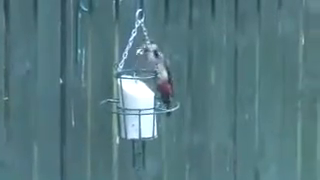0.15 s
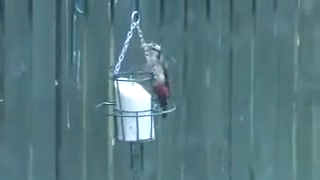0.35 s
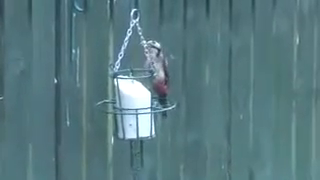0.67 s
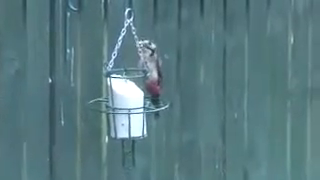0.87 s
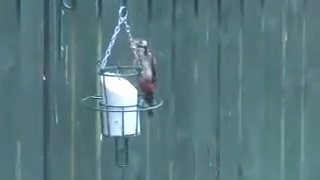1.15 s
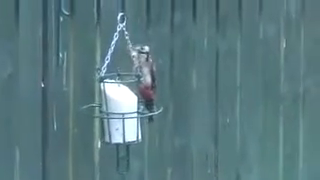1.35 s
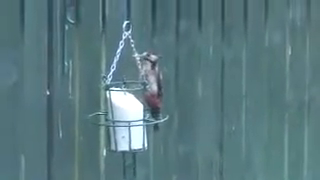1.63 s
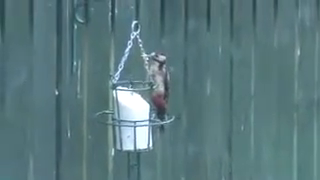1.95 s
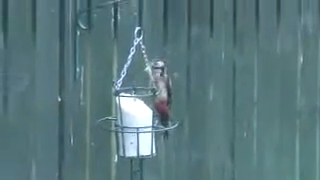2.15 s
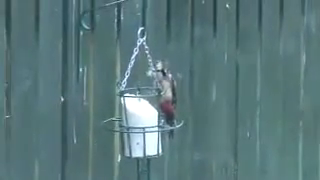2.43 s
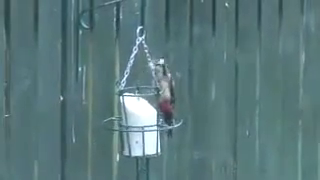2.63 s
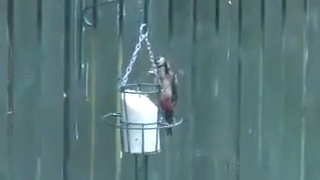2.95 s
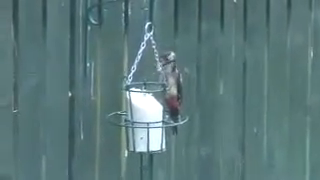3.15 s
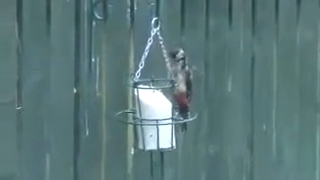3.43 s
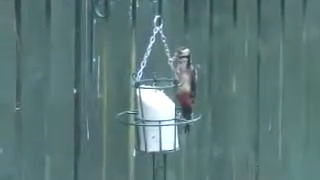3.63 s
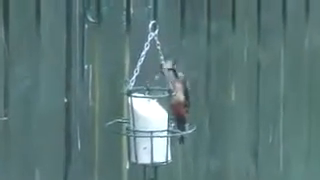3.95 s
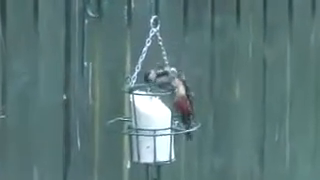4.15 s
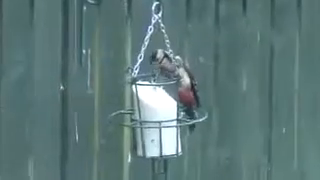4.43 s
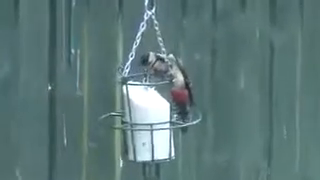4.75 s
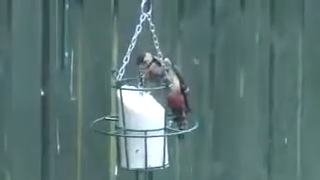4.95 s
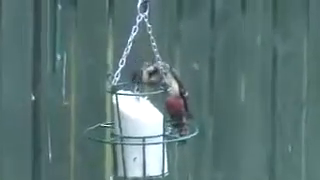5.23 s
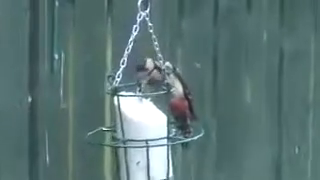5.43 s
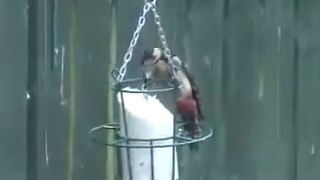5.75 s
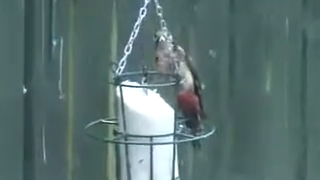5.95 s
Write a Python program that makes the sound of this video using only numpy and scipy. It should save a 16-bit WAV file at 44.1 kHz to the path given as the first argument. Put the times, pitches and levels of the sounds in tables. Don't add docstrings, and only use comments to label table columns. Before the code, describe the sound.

Sharp, hollow pecks and tiny wire clicks come in uneven bursts, with brief claw scrapes, above a constant electrical hum, thin whine and hiss.

```python
import sys
import numpy as np
from scipy import signal
from scipy.fft import rfft, irfft
from scipy.io import wavfile
from scipy.ndimage import map_coordinates

SR = 44100
rng = np.random.default_rng(int(sys.argv[2]) if len(sys.argv) > 2 else 0)


def amplitude_ratio(level_db):
    exponent = np.asarray(level_db, float) / 20
    return 10 ** exponent


def wav_record(signal):
    frames = np.transpose(np.atleast_2d(signal))
    bounded = np.clip(frames, -1, 1)
    quanta = np.round(bounded * 32767).astype(np.int16)
    wavfile.write(sys.argv[1], SR, quanta)


N = 268128
TOP_HZ = 15900


def along(points, hz):
    f, v = np.transpose(points)
    return np.interp(np.log(hz + 1), np.log(f + 1), v)


def unit(x):
    return x / np.sqrt(np.mean(x ** 2) + 1e-20)


def wobble(rate):
    points = rng.standard_normal(int(N * rate / SR) + 4)
    return map_coordinates(points, [np.arange(N) * rate / SR])


def empty_track():
    return np.zeros((2, N + SR))


def add(track, s, sound):
    place = track[:, max(round(s * SR), 0):]
    place[:, :sound.shape[1]] += sound


# pitch in Hz, time to fade by 60 dB in seconds.
ROOM = [(60, 0.74), (500, 0.53), (2000, 0.33), (5000, 0.37), (14000, 0.14)]
# pitch in Hz, shared part of the tail [0 to 1].
SHARED = [(200, 0.93), (700, 0.74), (3000, 0.27), (12000, 0.75)]
# delay in seconds, left level in dB, right level in dB.
WALLS = [(.0028, 3, -5), (.0052, 8, 2), (.0078, 4, -1), (.012, -5, -1), (.0165, -8, -4), (.022, -8, -4)]


def in_room(x, wet_db, left_db, right_db):
    size = SR // 3
    hz, t, z = signal.stft(rng.standard_normal((3, size)), SR, nperseg=256)
    shared = np.clip(along(SHARED, hz), 0, 1)[:, None]
    z = np.sqrt(shared) * z[2] + np.sqrt(1 - shared) * z[:2]
    fade = amplitude_ratio(-60 * t / along(ROOM, hz)[:, None])
    tail = signal.istft(z * fade, SR, nperseg=256)[1][:, :size]
    tail = tail * (1 - np.exp(-np.arange(size) / SR / .004))
    tail = tail / np.linalg.norm(tail[0]) * amplitude_ratio([[wet_db + .2], [wet_db - .2]])
    tail[:, 0] += amplitude_ratio([left_db, right_db])
    for delay, left, right in WALLS:
        arrival = delay * SR * rng.uniform(.9, 1.1) + rng.uniform(0, 3.5, size=2)
        tail[[0, 1], np.round(arrival).astype(int)] += amplitude_ratio([left, right])
    return signal.fftconvolve(x[None], tail, axes=1)


def burst(hz, cycles):
    turns = np.arange(SR // 30) / SR * hz
    age = turns * 1.5 / max(cycles, .6)
    return np.sin(2 * np.pi * turns) * (age * np.exp(1 - age)) ** 3


def thud(db, hz, cycles):
    return amplitude_ratio(db - 14.0) * (burst(hz, cycles) - burst(0.53 * hz, 0.89))


def blend(parts):
    z = rfft(parts)
    size = np.sqrt(np.sum(abs(z) ** 2, 0))
    return irfft(size * np.exp(1j * np.angle(z.sum(0))), parts.shape[1])


# time in seconds, hum level in dB.
HUM_DRIFT = [(0.0, -44), (0.74, -43), (1.83, -44), (2.44, -45.5), (2.83, -45.5), (3.28, -44.5),
             (3.79, -43.5), (4.91, -43.5), (5.84, -46), (6.08, -44.5)]


def hum_drift():
    s, hum_db = np.transpose(HUM_DRIFT)
    return np.interp(np.arange(N) / SR, s, hum_db), hum_db.mean()


def mains_hum():
    t = np.arange(N) / SR
    level = amplitude_ratio(hum_drift()[0] + 0.27 * wobble(25))
    return np.sqrt(2) * level * np.sin(2 * np.pi * 120.0 * t + 0.055 * wobble(3.6))


# pitch in Hz, rms level in dB.
MOTOR = [(1319, -69.5), (1561, -70.5), (2099, -70.5), (2697, -66.5), (5701, -71)]
# multiple of its base pitch, rms level in dB.
CIRCUIT = [(1, -70.5), (3, -71.5), (4, -71), (5, -71)]
# pitch in Hz, rms level in dB.
BRUSHES = [(2000, -76), (3000, -76.5), (6000, -75), (8000, -88), (13000, -98), (15500, -114)]


def camera_whine():
    t = np.arange(N) / SR
    drift = wobble(25)
    circuit_hz, brush_hz = 2885.0, 300.0
    tones = list(MOTOR) + [(k * circuit_hz, db) for k, db in CIRCUIT]
    out = sum(amplitude_ratio(db + 2.0) * np.sin(2 * np.pi * hz * t + 0.097 * drift) for hz, db in tones)
    for hz in np.arange(brush_hz * 7, TOP_HZ, brush_hz):
        level = amplitude_ratio(along(BRUSHES, hz) + rng.normal(1.6, 0.8))
        out += level * np.sin(2 * np.pi * (hz * t + rng.uniform()) + drift)
    return out


# pitch in Hz, level in dB per Hz.
HISS = [(15, -64), (30, -13), (53, -26), (84, -22), (150, -28), (200, -29), (335, -30), (550, -24),
        (900, -30.5), (1300, -29.5), (2500, -36), (5800, -38.5), (7200, -41), (12000, -43), (16000, -48.5)]
# pitch in Hz, likeness [0 to 1].
ALIKE = [(30, 0.39), (70, 0.09), (250, 0.32), (1000, 0.3), (7000, 0.14), (11000, 0.6), (15000, 0.86)]


def microphone_hiss():
    hz, _, z = signal.stft(rng.standard_normal((2, N + 8192)), SR, nperseg=4096)
    turn = np.arccos(np.clip(along(ALIKE, hz), 0, 1)) / 2
    z = z * (amplitude_ratio(along(HISS, hz)) * [np.cos(turn), np.sin(turn)])[..., None]
    mid, side = signal.istft(z, SR, nperseg=4096)[1][:, 4096:N + 4096]
    hiss = np.array([mid + side, mid - side]) / np.std(mid) * amplitude_ratio([[.4], [-.4]])
    hum_db, mean_db = hum_drift()
    follow_db = 0.2 * (hum_db - mean_db)
    patchy_db = .4 * wobble(1.89) + .6 * wobble(13)
    return hiss * amplitude_ratio(-52.5 + 1.0 + follow_db + patchy_db)


SPOTS = {"face": (2000, 2420, 1226, 3.2), "edge": (1795, 2380, 1350, 2.67), "side": (2100, 2890, 1097, 2.8),
         "top": (1980, 3360, 1010, 3.47), "rim": (1790, 3490, 1060, 4.06), "crust": (2230, 2630, 1150, 2.5),
         "base": (1620, 2760, 1330, 2.6), "lip": (2140, 3270, 1010, 3.3), "hollow": (1910, 2760, 1090, 4.6),
         "core": (1780, 2870, 780, 2.1)}


def beak_blow(db, high_db, knock_db, spot):
    low_hz, high_hz, knock_hz, cycles = SPOTS[spot]
    low = amplitude_ratio(db - 9.5) * burst(low_hz, cycles)
    high = amplitude_ratio(db + high_db - 7) * burst(high_hz, cycles)
    between = amplitude_ratio(db + high_db * 0.49 - 4.5) * burst(np.sqrt(low_hz * high_hz), 1.0)
    above = amplitude_ratio(db + high_db - 13) * burst(1.37 * high_hz, 2.7)
    knock = amplitude_ratio(knock_db - 11) * burst(knock_hz, 2.33)
    blow = blend(np.array([low, high, between, above, knock])) + thud(-46, 560, 2.2)
    return in_room(blow, wet_db=9, left_db=8, right_db=-2)


# start in seconds, peak level
# in dB, spot.
LIGHT_PECKS = [(0.001, -39, "base"), (2.6733, -49, "side"), (3.3211, -50, "base"), (3.4728, -39.5, "side"),
               (3.5957, -39.5, "side"), (3.6158, -43, "rim"), (4.0146, -40.5, "edge"), (4.372, -41.5, "rim"),
               (4.394, -37.5, "face"), (4.7336, -46, "side"), (5.084, -41.5, "side"), (5.4333, -55, "side")]


def light_pecks():
    out = empty_track()
    for s, db, spot in LIGHT_PECKS:
        add(out, s - .001, beak_blow(db, 1, db + 3, spot))
    return out[:, :N]


def wire_contact(db, ring_hz, length, tilt, ring_db):
    t = np.arange(SR // 16) / SR
    hz = np.fft.rfftfreq(len(t), 1 / SR)
    colour = amplitude_ratio(tilt * np.log2(hz / 8000 + 0.004))
    colour = colour / (1 + (3000 / (hz + 1)) ** 4) / (1 + (hz / 16500) ** 8)
    colour += amplitude_ratio(ring_db + 10.5) / (1 + ((hz - ring_hz) / 500) ** 2)
    scrape = unit(irfft(rfft(rng.standard_normal(len(t))) * colour, len(t)))
    length = max(length, .0005)
    swell = 1 - np.exp(-t / (0.74 * length))
    scrape *= swell * np.exp(-t / length) / np.sqrt(length / 0.0077)
    smooth = unit(irfft(colour * np.exp(1j * np.angle(rfft(scrape))), len(t)))
    scrape = np.std(scrape) * smooth
    return amplitude_ratio(db - 12) * in_room(scrape, wet_db=7.5, left_db=2, right_db=-2)


# start in seconds, peak level in dB, ring pitch in Hz, length in seconds.
SCRAPES = [
    (0.0085, -34, 9600, 0.0038),
    (1.194, -34.5, 8660, 0.0068),
    (2.577, -41, 8700, 0.01),
    (3.392, -22.5, 10600, 0.011),
    (3.47, -27, 10900, 0.01),
    (3.492, -46, 10500, 0.0087),
    (3.608, -22, 9700, 0.0076),
    (4.012, -40, 8160, 0.015),
    (4.629, -32, 8280, 0.01),
]


def claw_scrapes():
    out = empty_track()
    for s, db, ring_hz, length in SCRAPES:
        add(out, s - .002, wire_contact(db, ring_hz, length, tilt=-3, ring_db=-10.5))
    return out[:, :N]


# start in seconds, peak level in dB, high ring over that level in dB, knock level in dB, spot.
PECKS = [(0.0173, -36, -1, -37, "face"), (0.8209, -22, -9, -28.5, "face"), (1.011, -25.5, 1, -34.5, "side"),
         (1.1949, -32.5, -1, -32, "core"), (1.3322, -27, -3.5, -34, "edge"),
         (1.4197, -18.5, -8.5, -30.5, "top"), (1.6044, -25.5, -13.5, -22.5, "face"),
         (1.721, -17.5, -3.5, -60, "rim"), (1.8947, -20.5, -7.5, -26, "crust"),
         (2.4199, -25, -17.5, -38, "hollow"), (2.533, -34, -5, -35, "edge"),
         (2.5613, -21.5, -11.5, -25.5, "side"), (2.716, -25, -3, -40.5, "lip"),
         (2.835, -36, 6, -40, "hollow"), (2.9593, -26, 4, -25.5, "base"), (3.3968, -35.5, 7, -33, "core"),
         (3.776, -26.5, -8.5, -26, "base"), (3.872, -25, -8, -30.5, "crust"),
         (4.567, -24.5, -15, -35.5, "lip"), (4.6284, -34, 3.5, -31, "edge"),
         (4.8658, -16.5, -12.5, -29, "top"), (4.8844, -26, -4, -31, "face"),
         (4.9304, -33.5, 2, -27.5, "side"), (4.9825, -27, -6.5, -38.5, "top")]


def pecks():
    out = empty_track()
    for s, db, high_db, knock_db, spot in PECKS:
        add(out, s - .001, beak_blow(db, high_db, knock_db, spot))
    return out[:, :N]


# start in seconds, peak level in dB, pitch in Hz.
BUMPS = [(0.687, -53, 300), (1.195, -38, 375), (1.218, -37.5, 620), (1.333, -44.5, 460), (1.01, -47, 416),
         (1.896, -42, 560), (3.394, -40, 650), (3.473, -46, 680), (3.597, -41.5, 700), (4.563, -39.5, 690),
         (4.865, -28.5, 685), (4.884, -30.5, 546), (4.931, -40, 415), (4.98, -41, 338), (5.082, -44.5, 426),
         (5.92, -48, 263)]


def body_bumps():
    out = empty_track()
    for s, db, hz in BUMPS:
        add(out, s, in_room(thud(db, hz, 1.8), wet_db=10.5, left_db=-12, right_db=-8))
    return out[:, :N]


# start in seconds, peak level in dB, ring pitch in Hz, tilt in dB per octave.
TICKS = [(0.825, -32.5, 8810, -7.5), (1.007, -29, 8040, -4.5), (1.132, -33, 12400, -7),
         (1.33, -28, 11300, -12.5), (1.42, -30.5, 8750, 1), (1.504, -37, 12900, 5), (1.528, -40, 11600, 3),
         (1.606, -33, 12800, -7), (1.7204, -24, 8070, -0.5), (1.828, -35, 11500, -9),
         (1.896, -29.5, 8560, -3), (2.424, -31.5, 8450, -7.5), (2.54, -30, 12100, -11),
         (2.566, -19.5, 9220, -15), (2.671, -31, 12400, -1), (2.719, -34.5, 8860, -1),
         (2.835, -28, 12500, -2.5), (2.9634, -32, 8500, -4), (3.777, -27, 12500, -14.5),
         (3.87, -28.5, 12100, -11.5), (4.0153, -30.5, 8300, 10), (4.562, -31, 8140, -9),
         (4.63, -27, 8280, 16), (4.727, -33, 10100, 17), (4.861, -23, 9000, -11),
         (4.881, -22.5, 7500, -7.5), (4.929, -27, 11800, -6), (4.978, -35.5, 9470, 8),
         (5.079, -34.5, 11800, 2), (5.434, -30, 11100, -4.5)]
# ring pitch in Hz, ring strength in dB.
WIRE_RING = [(8000, -17.5), (12500, 1)]


def wire_ticks():
    out = empty_track()
    for s, db, ring_hz, tilt in TICKS:
        add(out, s - .002, wire_contact(db, ring_hz, 0.0021, tilt, along(WIRE_RING, ring_hz)))
    return out[:, :N]


# start in seconds, strength in dB, lean to the deepest sway in dB.
JOLTS = [(0.83, -44, -7), (1.016, -45, -9), (1.107, -59, 7), (1.209, -53, 16), (1.338, -50, -12),
         (1.43, -41.5, -7), (1.518, -67, -15), (1.622, -47, -21), (1.731, -43.5, -11), (1.82, -55, -9),
         (1.899, -45, -16), (1.979, -57, 8), (2.438, -47, -13), (2.577, -46, -13), (2.658, -54, -11),
         (2.721, -45.5, 10), (2.969, -44, -16), (3.409, -45, 0), (3.608, -44, 7), (3.779, -53, -13),
         (3.878, -44, 3), (4.379, -53, -11), (4.568, -45, -5), (4.639, -49, -4), (4.787, -54, -22),
         (4.872, -40, -8), (4.938, -56, -24), (5.02, -50, -1), (5.089, -47, -1), (5.84, -54, -1)]
# pitch in Hz, swell time in seconds.
FRAME = [(58, 0.029), (88, 0.018), (190, 0.016)]


def frame_jolts():
    out, t = empty_track(), np.arange(SR // 3) / SR
    shakes = [(s, db + lean_db / 2, db - lean_db / 2, db - 6) for s, db, lean_db in JOLTS]
    shakes += [(s + 0.0103, -120, -120, db - 11) for s, db, _ in BUMPS]
    for s, *levels in shakes:
        for (hz, swell), db in zip(FRAME, levels):
            turns = hz * rng.uniform(0.893, 1.122) * t + rng.uniform()
            envelope = (t / swell) ** 1.31 * np.exp(-t / swell)
            add(out, s, amplitude_ratio(db + 4.0) * envelope * np.sin(2 * np.pi * turns) * np.ones((2, 1)))
    return out[:, :N]


# start in seconds, peak level in dB, pitch in Hz.
LINKS = [
    (1.8944, -34.5, 8460),
    (2.4269, -40.5, 8450),
    (2.6678, -39, 8240),
    (2.836, -41, 8240),
    (3.715, -41, 7920),
    (4.0144, -40, 8200),
    (4.6314, -37, 8280),
]


def chain_links():
    out, t = empty_track(), np.arange(SR // 16) / SR
    for s, db, ring_hz in LINKS:
        ring = np.sin(2 * np.pi * ring_hz * t) * np.exp(-t / 0.0029) * (1 - np.exp(-t / 0.0009))
        add(out, s, amplitude_ratio(db - 12.5) * in_room(ring, wet_db=15.0, left_db=14, right_db=10))
    return out[:, :N]


# start in seconds, peak level in dB, pitch in Hz.
BARS = [
    (5.437, -39.5, 2950),
    (2.836, -48, 2930),
    (3.874, -40, 2560),
    (4.395, -44, 1510),
    (5.1, -46, 1150),
]


def cage_bars():
    out = empty_track()
    for s, db, ring_hz in BARS:
        add(out, s, amplitude_ratio(db - 6.5) * in_room(burst(ring_hz, 5.1), wet_db=10.5, left_db=.5, right_db=-4))
    return out[:, :N]


def scene():
    machine = mains_hum() + camera_whine() + microphone_hiss()
    beak_and_body = light_pecks() + pecks() + body_bumps()
    metal = claw_scrapes() + wire_ticks() + chain_links() + cage_bars()
    return machine + beak_and_body + metal + frame_jolts()


def low_pass(x):
    return signal.sosfilt(signal.butter(12, 16160, fs=SR, output="sos"), x)


def record(dry):
    hz = np.fft.rfftfreq(N, 1 / SR)
    response = (hz < TOP_HZ) / np.sqrt(1 + (44 / (hz + 1)) ** 9)
    mix = irfft(rfft(dry) * response, N)
    return low_pass(mix)


dry = scene()
out = record(dry)
wav_record(out)
```